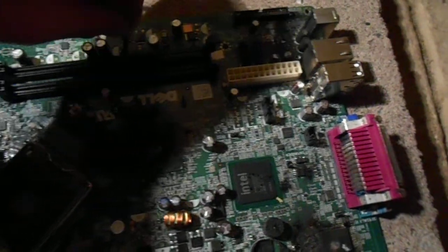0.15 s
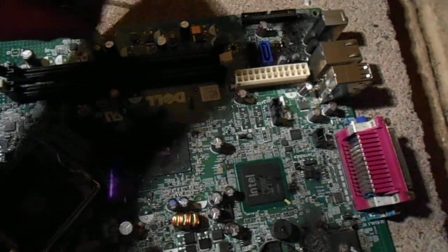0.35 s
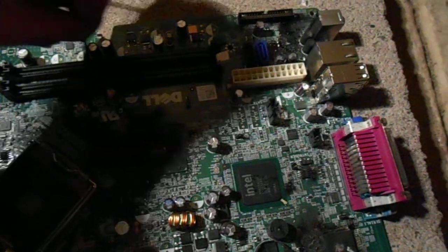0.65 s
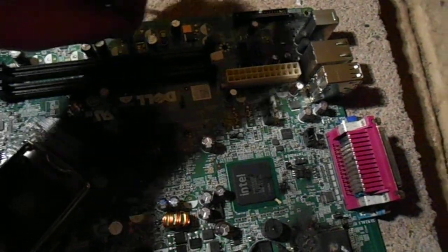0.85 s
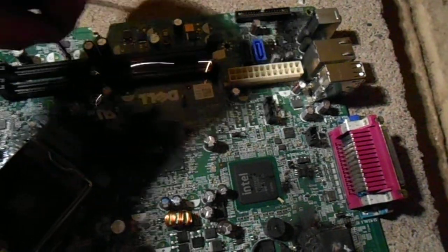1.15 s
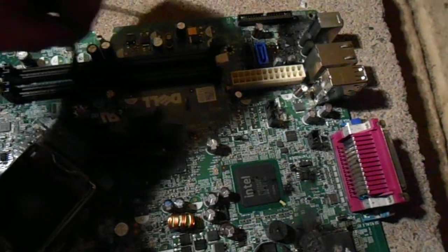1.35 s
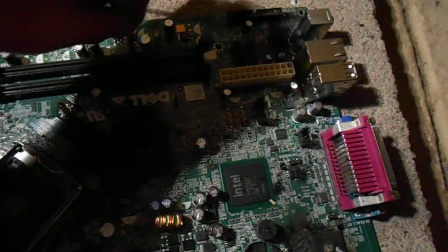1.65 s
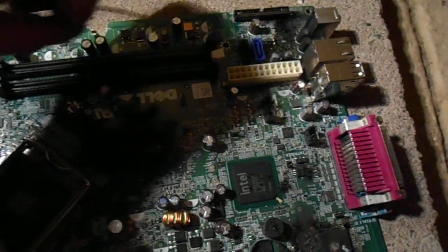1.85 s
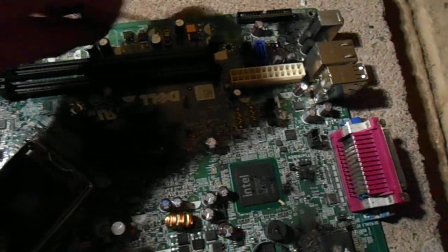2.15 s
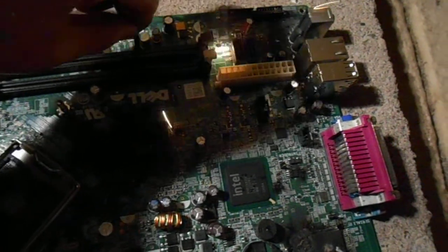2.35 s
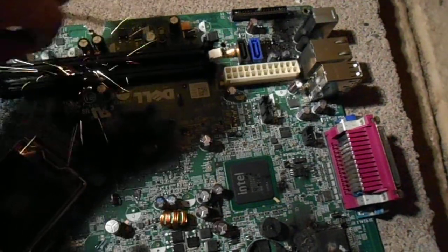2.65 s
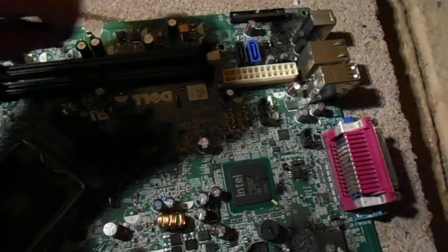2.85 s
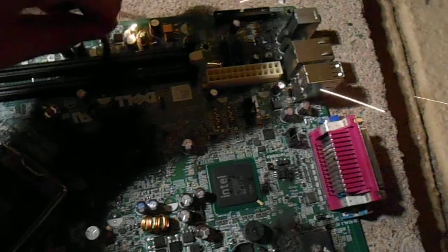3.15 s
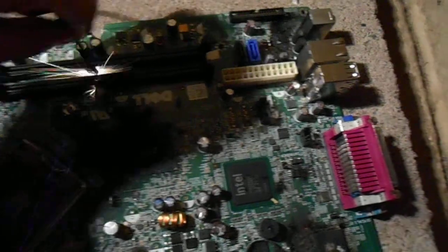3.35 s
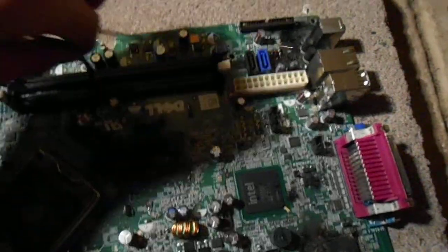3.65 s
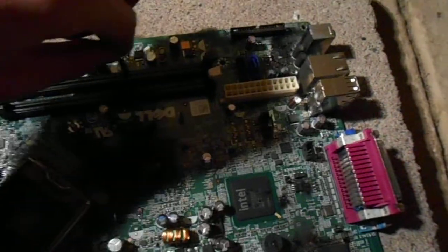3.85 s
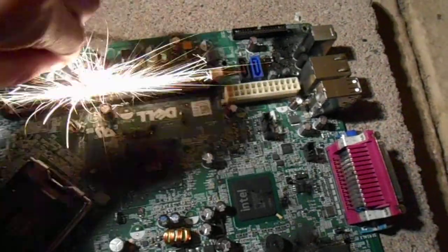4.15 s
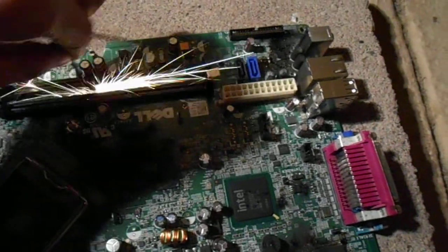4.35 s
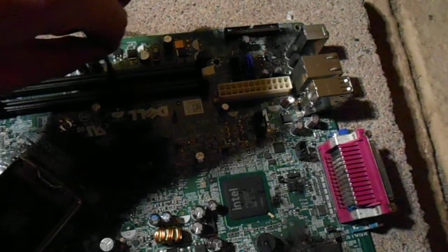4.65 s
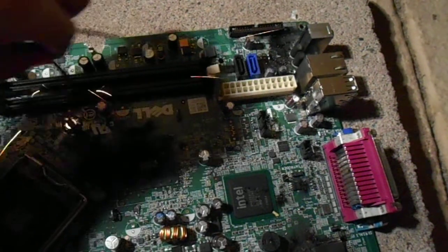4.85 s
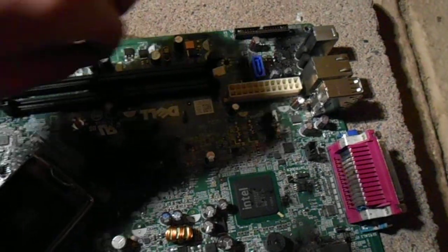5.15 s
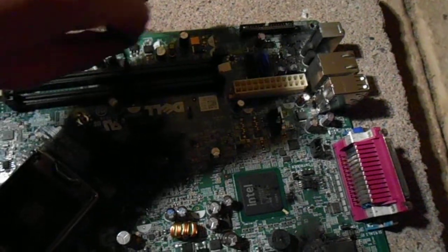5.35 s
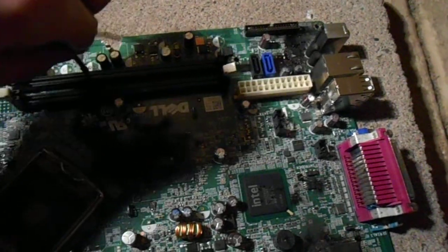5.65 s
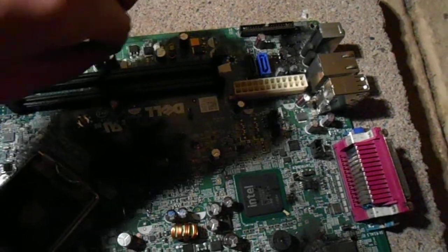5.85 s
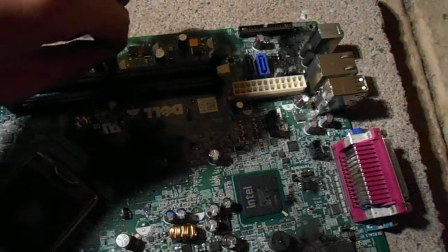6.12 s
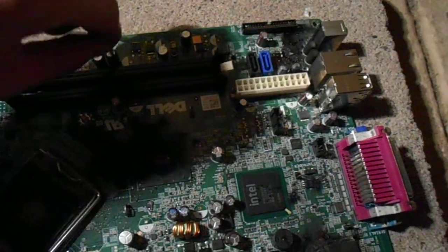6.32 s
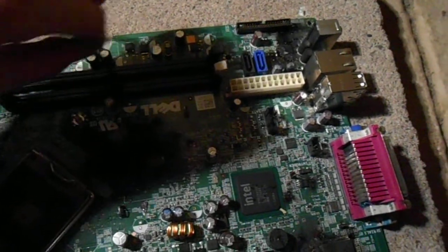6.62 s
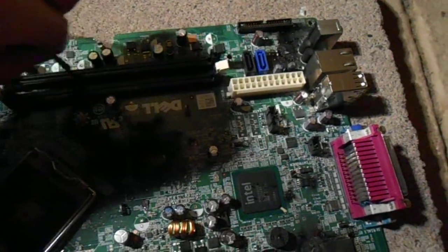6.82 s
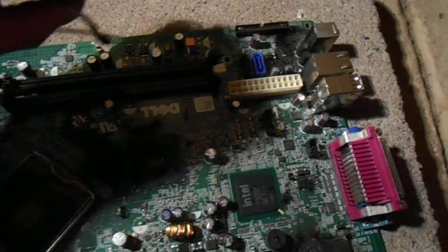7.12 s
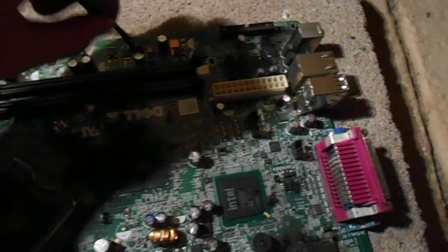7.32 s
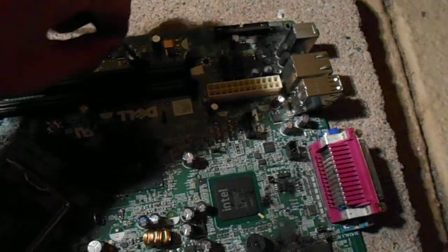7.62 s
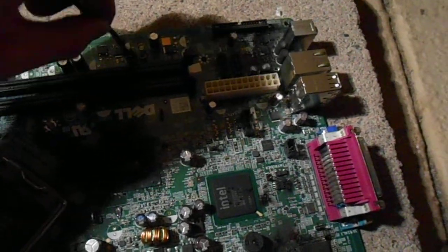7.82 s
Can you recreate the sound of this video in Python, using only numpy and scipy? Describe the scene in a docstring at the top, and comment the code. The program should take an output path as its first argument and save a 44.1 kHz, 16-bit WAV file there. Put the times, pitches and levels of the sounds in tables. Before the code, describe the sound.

Close up in a small room, electric arcs snap in irregular clusters as the tip of a lead scratches and ticks across a circuit board. The board and small metal parts ring briefly, and each crack has a short echo. A single thump hits the microphone midway. Beneath it all, a low wavering hum sinks to a quieter level, while rumble and room noise dip after the louder snaps.

```python
"""A small room, close on a circuit board: a live lead is dragged again and again over its pins.
The tip scrapes, taps and sputters, the board and small metal parts ring, and arcs snap at the
contacts and echo off the walls. One current surge thumps the microphone. Underneath lie a low hum,
a rumble and room noise that the gain control pumps."""
import sys
import numpy as np
from scipy import signal
from scipy.fft import rfft, irfft, next_fast_len
from scipy.io import wavfile
from scipy.ndimage import uniform_filter1d, minimum_filter1d

SR = 44100
rng = np.random.default_rng(int(sys.argv[2]) if len(sys.argv) > 2 else 0)


def transcribe(signal):
    """Save signal, clipped to [-1, 1], as a 16-bit WAV file at the path in sys.argv[1]."""
    frames = np.atleast_2d(signal).T
    limited = np.clip(frames, -1, 1)
    pcm = np.round(limited * 32767).astype(np.int16)
    wavfile.write(sys.argv[1], SR, pcm)


N = 351908
TIME = np.arange(N) / SR

# tone of the room noise: frequency_hz, level_db
ROOM_NOISE_EQ = [(20, 1), (50, -17), (90, 0), (130, 2.5), (200, -3.5), (350, -10.5), (700, -7), (1100, -11),
                 (2000, -17), (4000, -21.5), (7000, -24), (10000, -22.5), (16000, -64)]
# tone of the rumble: frequency_hz, level_db
RUMBLE_EQ = [(10, -15), (35, 0.5), (90, -8), (200, -13), (600, -28.5), (2000, -74)]
# tone of the reverb: frequency_hz, level_db
REVERB_EQ = [(60, 22), (400, 6.5), (1000, 5.5), (2000, 0), (4000, 1.5), (7000, -0.5), (10000, -1),
             (16000, 0)]
# decay of the reverb: frequency_hz, t60_s
REVERB_DECAY = [(200, 0.33), (1000, 0.38), (4000, 0.36), (8000, 0.37), (12000, 0.33)]
# resonances of the board: pitch_hz, width_hz, level_db
BOARD_MODES = [(917, 31.4, -2), (1056, 62.4, 10), (1176, 27, -6), (1637, 21, -7), (1773, 85, 3.5),
               (2074, 21, -13), (2524, 84, -5), (2910, 52, -2), (3348, 64, -6.5), (3990, 480, -38.5),
               (5430, 44, -7.5)]
# small metal parts set ringing: start_s, pitch_hz, level_db, t60_s
METAL_PINGS = [(0.418, 4280, -23, 0.065), (6.352, 7700, -47, 0.3), (6.373, 7700, -7, 0.053),
               (6.9, 1698, -18, 0.16), (6.901, 2440, -48, 1.16), (6.9, 4220, -46, 0.7),
               (7.471, 1220, -24, .045), (7.513, 1150, -15.5, 0.064)]
# the contact sputters in one band: start_s, length_s, centre_hz, width_hz, level_db
SPUTTERS = [(1.39, 0.22, 3125, 1100, -40), (1.61, 0.019, 2270, 550, -30.5), (1.891, 0.018, 4500, 4500, -19),
            (5.137, 0.17, 2647, 1530, -28), (6.693, 0.19, 1617, 760, -35), (7.472, .012, 3393, 4150, -23),
            (7.654, 0.15, 8100, 1400, -45)]
# drags of the tip over the pins: touch_down_s, lift_off_s, lift_off_level_db
TIP_STROKES = [(0.32, 0.435, -35.5), (0.715, 0.833, -31), (0.982, 1.177, -28.5), (1.401, 1.565, -31.5),
               (1.735, 1.932, -32), (2.085, 2.265, -31), (2.476, 2.675, -30.5), (3.982, 4.168, -33.5),
               (4.524, 4.579, -45), (4.754, 4.873, -30.5), (5.096, 5.268, -34.5), (5.441, 5.566, -28),
               (6.666, 6.82, -34), (6.88, 6.93, -33.5)]
# tone of the scrape: frequency_hz, level_db
SCRAPE_EQ = [(60, -22.5), (300, -19.5), (700, 0.5), (1400, -11.5), (2200, -2.5), (3100, 3), (4500, -2),
             (6500, 0), (9500, 3), (16000, -25)]
# knocks of the tip on the board: start_s, ring_db, tick_db
TIP_TAPS = [(0.335, -24, -25), (0.369, -30, -29.5), (0.4, -27.5, -41), (0.44, -24, -22.5),
            (0.772, -28.5, -24), (0.877, -30.5, -31.5), (0.95, -38.5, -58), (1.058, -44, -38),
            (1.214, -37, -29), (1.371, -40.5, -41.5), (1.52, -29.5, -20), (1.613, -35, -29),
            (1.7, -37, -47), (1.75, -30.5, -32), (1.875, -31.5, -20.5), (1.937, -31, -24.5),
            (2.233, -23, -28.5), (2.296, -34, -21.5), (2.348, -33.5, -39), (2.38, -30.5, -43),
            (2.917, -28.5, -19), (2.931, -36.5, -28.5), (2.987, -46, -32.5), (3.181, -39, -34),
            (3.234, -35, -44.5), (3.284, -37, -37.5), (3.313, -37, -35), (3.346, -25, -24),
            (3.524, -33, -26), (3.686, -36.5, -27.5), (3.726, -47, -35.5), (3.772, -23.5, -21.5),
            (3.922, -41, -52), (4.535, -31, -29), (4.822, -34, -30), (5.209, -30, -31), (5.26, -43, -23),
            (5.609, -37, -34), (5.912, -37, -31), (6.338, -32, -31.5), (6.41, -35.5, -32.5),
            (6.712, -32, -39), (6.751, -30, -31), (6.783, -29, -28), (6.931, -39, -24), (6.971, -30, -30.5),
            (7.469, -23.5, -26.5), (7.509, -26, -26.5), (7.609, -21.5, -27), (7.682, -39, -32.5),
            (7.703, -30.5, -32), (7.778, -35.5, -35.5), (7.798, -46, -27)]
# tone of a tap's metallic tick: frequency_hz, level_db
TICK_EQ = [(100, -33), (800, -9.5), (2000, -4.5), (3200, 1.5), (4500, -3.5), (6700, 0), (8500, -2),
           (10000, 1), (16000, -21)]
# arcs between tip and pin: start_s, burn_s, treble_db, extra_body_db
ARC_SNAPS = [(0.013, 0.0045, -9, 1.5), (0.0726, 0.016, -13.5, -1), (0.0923, 0.0075, -14.5, 3.5),
             (0.42, 0.0068, -12, 1), (0.4942, 0.0036, -8.5, -5.5), (0.7889, 0.0026, -12.5, 8),
             (0.796, 0.0035, -12, 6), (0.8132, 0.013, -11.5, 5), (1.1542, 0.0013, -13, 2),
             (1.16, 0.00098, -7.5, 1), (1.1737, 0.0021, -13, -0.5), (1.182, 0.0072, -17.5, 9.5),
             (1.195, 0.003, -16, 3), (1.535, 0.011, -15.5, 6.5), (1.5571, 0.012, -16, 7.5),
             (1.9063, 0.0039, -10.5, 4.5), (1.921, 0.0051, -13, 8.5), (2.254, 0.002, -17, -9),
             (2.2608, 0.0055, -11.5, 8.5), (2.275, 0.0066, -15.5, 3.5), (2.6505, 0.0069, -12, 4),
             (2.6652, 0.022, -12, 0), (2.9505, 0.0018, -14, -15), (3.1076, 0.023, -10.5, 0),
             (3.4118, 0.031, -12.5, -1.5), (3.4605, 0.0056, -14, 0), (3.5013, 0.0017, -14.5, 0.5),
             (3.783, 0.02, -12, 2), (4.132, 0.0032, -17.5, 9.5), (4.1764, 0.029, -10, -4),
             (4.3916, 0.004, -14, -5), (4.4345, 0.0029, -16, -4), (4.4728, 0.0092, -13.5, -3.5),
             (4.5402, 0.0024, -12, -8), (4.8351, 0.0095, -11.5, -1), (4.855, 0.0053, -6.5, -13),
             (4.87, 0.0017, -18.5, -10.5), (4.887, 0.0052, -17, 6), (5.2283, 0.0063, -13, 3.5),
             (5.2421, 0.0043, -5, -7), (5.548, 0.0013, -15, 2.5), (5.562, 0.0015, -14, 4),
             (5.5784, 0.0038, -15, 1), (5.6238, 0.0059, -15.5, 3.5), (6.3511, 0.0072, -17.5, 10),
             (6.373, 0.0053, -22.5, 11.5), (6.819, 0.0033, -16.5, 12.5), (6.881, 0.0034, -11.5, 6.5),
             (6.898, 0.0083, -14.5, 7), (6.9163, 0.0052, -15.5, 12), (7.616, 0.0019, -12.5, 12.5)]
# tone of an arc's crackle: frequency_hz, level_db
ARC_EQ = [(40, -17.5), (150, -15), (400, -17.5), (800, -11), (1400, -15.5), (2200, -9.5), (3000, -8),
          (4300, -8), (6000, -3.5), (8000, -0.5), (10000, 4.5), (16000, -21)]
# the microphone's response, rolling off on top: frequency_hz, level_db
MICROPHONE_EQ = [(20, 1.5), (10200, -1), (10900, -12.5), (11900, -12), (12700, -39), (14000, -82.5)]

# in each stroke the tip bites, is pressed ever harder, then slides off
BITE_S, PRESS_DB_PER_S, LIFT_DB_PER_S = 0.05, 56, 317


def amp(db):
    """Decibels to gain."""
    return 10 ** (np.asarray(db) / 20)


def unit(x):
    """Scales to rms 1."""
    return x / np.sqrt(np.mean(x ** 2) + 1e-20)


def curve_at(points, hz):
    """Reads a curve on a log-frequency axis."""
    point_hz, value = np.transpose(points)
    return np.interp(np.log(hz + 1), np.log(point_hz + 1), value)


def eq(x, points):
    """Shapes the tone with an EQ curve."""
    size = next_fast_len(len(x) + 512)
    gain = amp(curve_at(points, np.fft.rfftfreq(size, 1 / SR)))
    return irfft(rfft(x, size) * gain, size)[:len(x)]


def wander(rate_hz):
    """A random modulator of rms 1 that glides to a new value rate_hz times a second."""
    return unit(np.interp(TIME * rate_hz, np.arange(N), rng.standard_normal(N)))


def add(mix, start_s, sound):
    """Drops a sound into the mix."""
    part = mix[max(round(start_s * SR), 0):][:len(sound)]
    part += sound[:len(part)]


def gain_control(x, threshold_db=-27, depth_db=15, hold_s=0.14, recover_db_per_s=110):
    """A gain that ducks at once when x is loud, holds, then recovers."""
    power_db = 10 * np.log10(abs(uniform_filter1d(x ** 2, size=130)) + 1e-12)
    over_db = np.clip(power_db - threshold_db, 0, depth_db)
    half_hold = int(hold_s * SR / 2)
    held_db = -minimum_filter1d(-over_db, 2 * half_hold + 1, origin=half_hold)
    recovery_db = TIME * recover_db_per_s
    return amp(recovery_db - np.maximum.accumulate(held_db + recovery_db))


def hum(pitch_hz=146.1, waver_hz=2.35, throb_db=2, fade_s=(1.9, 4.5), fade_db=(-40.5, -51)):
    """A low, wavering hum that holds, then sinks to a quieter level."""
    cycles = np.cumsum(pitch_hz + waver_hz * wander(25)) / SR
    level_db = np.interp(TIME, fade_s, fade_db) + throb_db * wander(16)
    return amp(level_db) * np.sqrt(2) * np.sin(2 * np.pi * cycles)


def background(gain, noise_db=-39, rumble_db=-49, low_duck_share=0.36):
    """The bed: dull room noise pumps with the gain; rumble and hum duck less deeply."""
    noise = amp(noise_db) * unit(eq(rng.standard_normal(N), ROOM_NOISE_EQ))
    rumble = amp(rumble_db) * unit(eq(rng.standard_normal(N), RUMBLE_EQ))
    return noise * gain + (rumble + hum()) * gain ** low_duck_share


def reverb(send, build_s=0.0098):
    """The small room: a diffuse tail in which each band dies at its own speed."""
    hz, t, bands = signal.stft(rng.standard_normal(SR * 3 // 4), SR, nperseg=256)
    decay_db = 60 * t / curve_at(REVERB_DECAY, hz)[:, None]
    bands = bands * amp(curve_at(REVERB_EQ, hz)[:, None] - decay_db)
    tail = signal.istft(bands, SR, nperseg=256)[1]
    tail *= np.minimum(np.arange(len(tail)) / SR / build_s, 1)
    return signal.oaconvolve(send, tail / np.linalg.norm(tail))[:N]


def board_impulse(weights):
    """The board's ring after a click, at energy 1; weights say how hard each mode is struck."""
    t = np.arange(SR // 10) / SR
    ring = sum(weight * amp(db) * np.exp(-np.pi * width_hz * t) * np.sin(2 * np.pi * hz * t)
               for weight, (hz, width_hz, db) in zip(weights, BOARD_MODES))
    return ring / np.linalg.norm(ring)


def board_ring(x):
    """A sound drives the board's modes, in alternating polarity."""
    return signal.oaconvolve(x, board_impulse((-1.) ** np.arange(len(BOARD_MODES))))[:N]


def tone_drift(x, depth_db=3):
    """The tone drifts as the tip moves from spot to spot."""
    bands = signal.stft(x, SR, nperseg=512)[2]
    drift = rng.standard_normal(bands.shape)
    for _ in range(2):
        drift = uniform_filter1d(drift, size=5, axis=0)  # smooth across frequency
        drift = uniform_filter1d(drift, size=13, axis=1)  # and across time
    return signal.istft(bands * amp(depth_db * unit(drift)), SR, nperseg=512)[1][:N]


def pings():
    """Pins and clips ring on after a knock, each a dying sine."""
    out = np.zeros(N)
    t = np.arange(SR) / SR
    for start_s, hz, db, t60_s in METAL_PINGS:
        add(out, start_s, amp(db - 60 * t / t60_s) * np.sin(2 * np.pi * hz * t))
    return out


def sputters(grit_db=3):
    """The contact sputters: gritty swells of noise, each in one resonance."""
    out = np.zeros(N)
    for start_s, length_s, hz, width_hz, db in SPUTTERS:
        t = np.arange(round(length_s * SR)) / SR
        pole = np.exp(-np.pi * width_hz / SR)
        complex_noise = rng.standard_normal((SR, 2)) @ [1, 1j]
        flutter = signal.lfilter([1], [1, -2 * pole, pole * pole], complex_noise)[:len(t)]
        band = unit((flutter * np.exp(2j * np.pi * hz * t)).real)
        add(out, start_s, amp(db) * band * np.sin(np.pi * t / length_s))
    return out * amp(grit_db * wander(300))


def pressure():
    """How hard the tip is dragged, as a gain: every stroke bites, swells and lifts off."""
    out = np.zeros(N)
    t = np.arange(SR) / SR
    bite = np.minimum(t / BITE_S, 1) ** 2
    for down_s, lift_s, db in TIP_STROKES:
        to_lift_s = lift_s - down_s - t
        swell_db = -PRESS_DB_PER_S * np.maximum(to_lift_s, 0)
        release_db = -LIFT_DB_PER_S * np.maximum(-to_lift_s, 0)
        add(out, down_s, bite * amp(db + swell_db + release_db))
    return out


def scrape(slips_per_s=4500, size_db=2, clump_db=3, rasp_db=2.5, ring_db=-2):
    """Thousands of tiny slips, in clumps, rasp and ring the board."""
    clicks = (rng.random(N) < slips_per_s / SR) * rng.choice([-1, 1], N)
    sizes = amp(size_db * np.minimum(rng.exponential(1, N), 4))
    slips = unit(clicks * sizes * amp(clump_db * wander(120)))
    rasp = amp(rasp_db) * unit(eq(slips, SCRAPE_EQ))
    return pressure() * (rasp + amp(ring_db) * board_ring(slips))


def stray_taps(per_stroke=3, ring_db=-5, tick_db=-10.5, spread_db=4, overrun_s=0.02):
    """Light chance taps along each stroke, harder near lift-off, as rows like TIP_TAPS."""
    rows = []
    for down_s, lift_s, stroke_db in TIP_STROKES:
        starts_s = rng.uniform(down_s + BITE_S, lift_s + overrun_s, per_stroke)
        levels_db = stroke_db - PRESS_DB_PER_S * abs(lift_s - starts_s)
        levels_db += spread_db * rng.standard_normal(per_stroke)
        rows += [(start_s, ring_db + db, tick_db + db) for start_s, db in zip(starts_s, levels_db)]
    return rows


def taps(rise_s=0.0013, chatter_s=0.0055, tick_decay_s=0.0054, knock_db=-6):
    """The tip chatters on a pin: a bright tick, a dull knock and a board ring that varies by spot."""
    out = np.zeros(N)
    t = np.arange(SR // 10) / SR
    onset = np.minimum(t / rise_s, 1)
    attack = slice(SR // 100)  # the first 10 ms set a tap's level
    knock_band = signal.butter(2, [700, 2600], "band", fs=SR)
    for start_s, ring_db, tick_db in TIP_TAPS + stray_taps():
        weights = rng.choice([-1, 1], len(BOARD_MODES)) * rng.uniform(0.29, 1, len(BOARD_MODES))
        force = rng.standard_normal(len(t)) * onset * np.exp(-t / chatter_s)
        ring = signal.fftconvolve(force, board_impulse(weights))[:len(t)]
        knock = signal.lfilter(*knock_band, force)
        body = unit(ring) + amp(knock_db) * unit(knock)
        tick = eq(rng.standard_normal(len(t)), TICK_EQ) * onset * np.exp(-t / tick_decay_s)
        add(out, start_s, amp(ring_db) * body / body[attack].std())
        add(out, start_s, amp(tick_db) * tick / tick[attack].std())
    return out


def surge(start_s=4.1705, length_s=0.00543, drive=2.46, rail=0.7, release_s=0.0012, leak_hz=2.3):
    """A current surge slams the microphone's input to its rail; coupling capacitors swing back slowly."""
    t = np.arange(SR) / SR
    push = -drive * np.exp(-np.maximum(t - length_s, 0) / release_s)
    coupling = signal.butter(1, leak_hz, "high", fs=SR)
    thump = signal.lfilter(*coupling, signal.lfilter(*coupling, push))
    out = np.zeros(N)
    add(out, start_s, np.clip(thump, -rail, rail))
    return out


def arc_crackle(samples, body_db, burn_doublings):
    """An arc's dense noise, its treble at rms 1; more body means more puff of air and less sizzle."""
    puff_db = 0.8 - 0.05 * burn_doublings + 0.16 * body_db
    sizzle_db = -1 - 0.5 * burn_doublings - 0.29 * body_db
    shelves = [(570, puff_db), (900, body_db), (2800, body_db),
               (4800, -sizzle_db / 2), (7700, -sizzle_db / 2), (9300, sizzle_db / 2)]
    crackle = eq(eq(rng.standard_normal(samples), ARC_EQ), shelves)
    treble = eq(crackle, [(4000, -60), (4500, 0), (10500, 0), (11000, -60)])
    return crackle / treble.std()


def arcs(rise_s=0.0004, decay_s=0.0017, scatter_db=-18, scatter_decay_s=0.015,
         typical_burn_s=0.0074, flicker_db=3, trim_db=1):
    """Each arc crackles while it burns, then dies at once; returns direct sound and reverb send."""
    direct, send = np.zeros((2, N))
    t = np.arange(SR // 12) / SR
    flicker = amp(flicker_db * wander(900))
    for start_s, burn_s, treble_db, body_db in ARC_SNAPS:
        burn_doublings = np.log2(burn_s / typical_burn_s)
        since_out_s = np.maximum(t - burn_s, 0)
        scatter = amp(scatter_db) * np.exp(-since_out_s / scatter_decay_s)  # off nearby surfaces
        envelope = np.minimum(t / rise_s, 1) * (np.exp(-since_out_s / decay_s) + scatter)
        snap = amp(treble_db + trim_db) * envelope * arc_crackle(len(t), body_db, burn_doublings)
        send_db = -17.5 + 1.5 * burn_doublings - 0.4 * body_db  # longer is wetter, fuller is drier
        add(direct, start_s - rise_s, snap)
        add(send, start_s, amp(send_db) * snap)
    return direct * flicker, send


def scene(arc_ring_db=-10, contact_send_db=-15):
    """The mono mix: arcs and contact noises up front, ducking the bed, with the room behind them."""
    snaps, arc_send = arcs()
    contact = tone_drift(taps() + scrape()) + sputters() + pings()
    close = snaps + amp(arc_ring_db) * tone_drift(board_ring(snaps)) + contact
    room = reverb(arc_send + amp(contact_send_db) * contact)
    return (close + room + surge() + background(gain_control(close)))[None]


def record(dry, limit=0.85, clip=0.75, cutoff_hz=16200):
    """The microphone dulls the top, a fast limiter holds the peaks, their tips clip, then a low-pass."""
    mic = eq(dry[0], MICROPHONE_EQ)
    allowed_gain = np.minimum(1, limit / (abs(mic) + 1e-9))
    limiter_gain = uniform_filter1d(minimum_filter1d(allowed_gain, size=13), size=13)
    clipped = np.clip(mic * limiter_gain, -clip, clip)
    low_pass = signal.firwin(255, cutoff_hz, window=("kaiser", 9), fs=SR)
    return signal.oaconvolve(clipped, low_pass, "same")[None]


dry = scene()
out = record(dry)
transcribe(out)
```